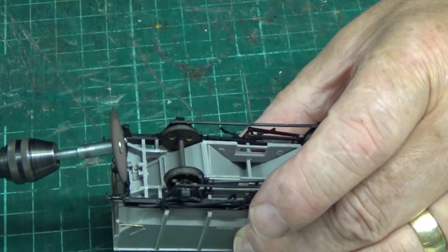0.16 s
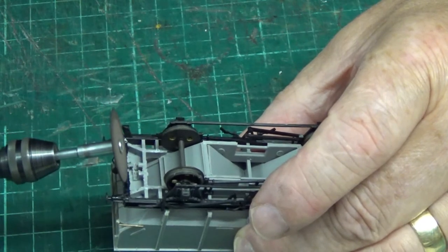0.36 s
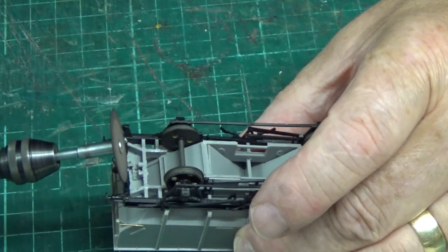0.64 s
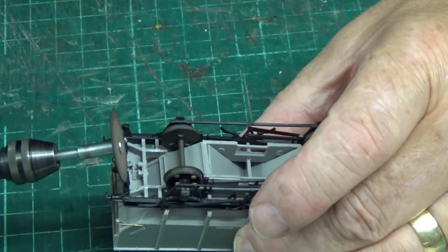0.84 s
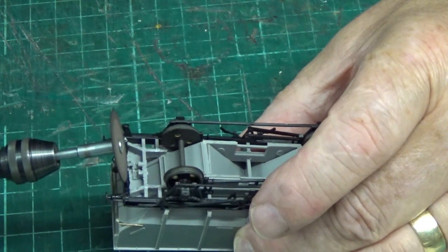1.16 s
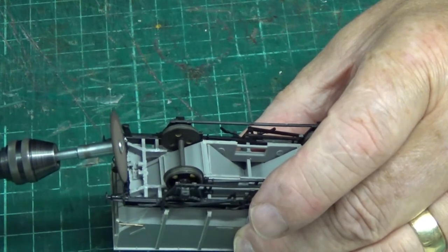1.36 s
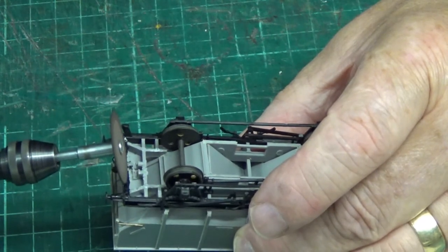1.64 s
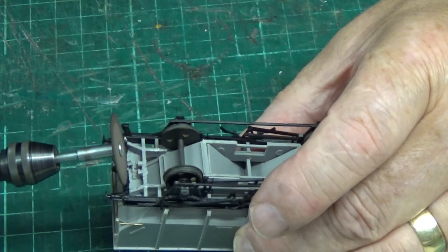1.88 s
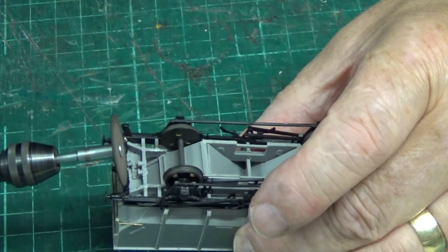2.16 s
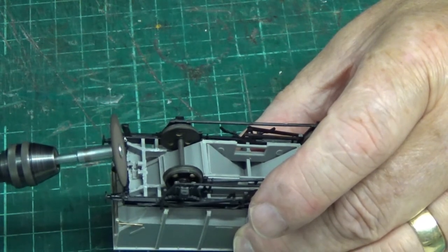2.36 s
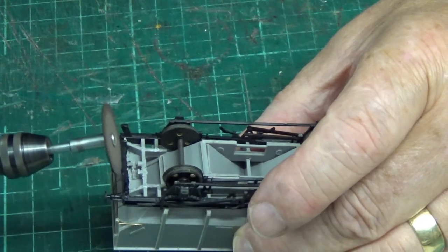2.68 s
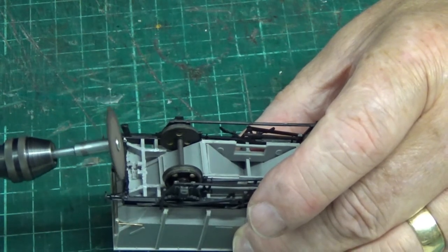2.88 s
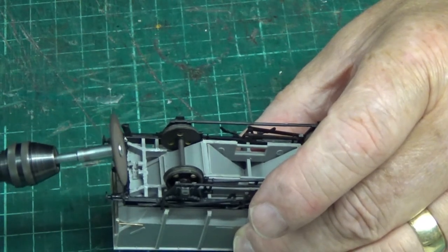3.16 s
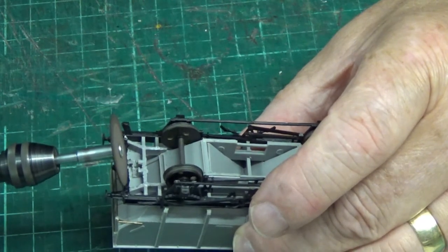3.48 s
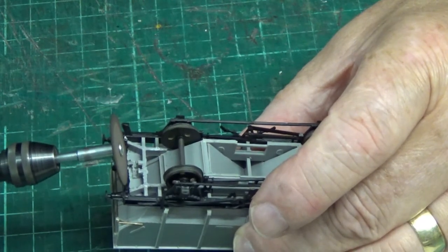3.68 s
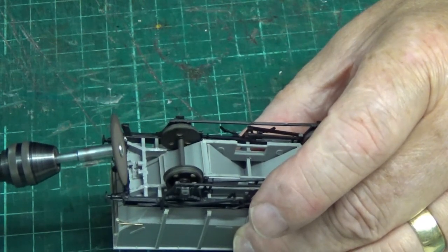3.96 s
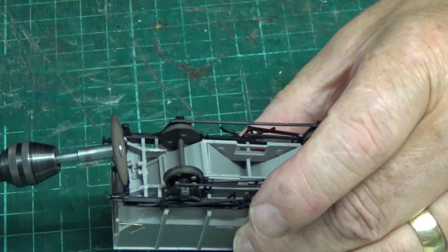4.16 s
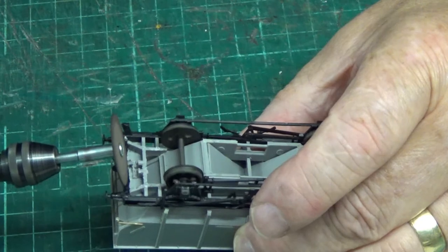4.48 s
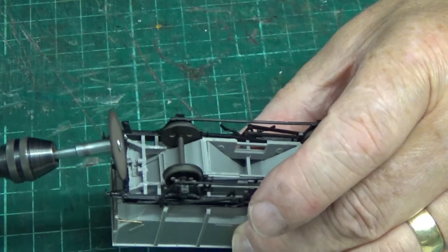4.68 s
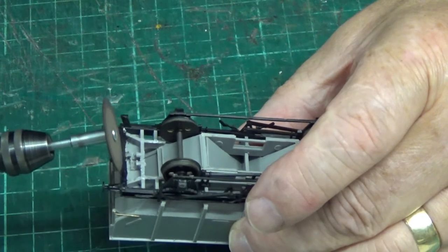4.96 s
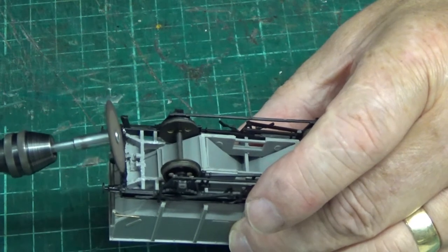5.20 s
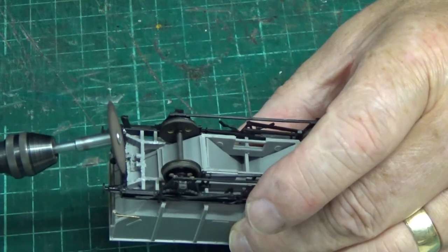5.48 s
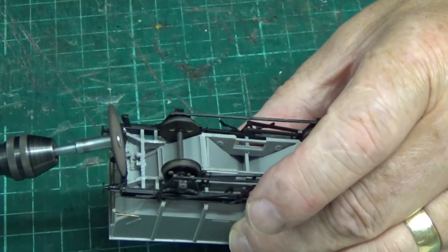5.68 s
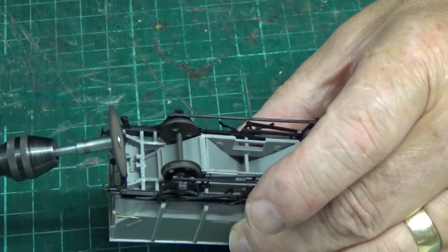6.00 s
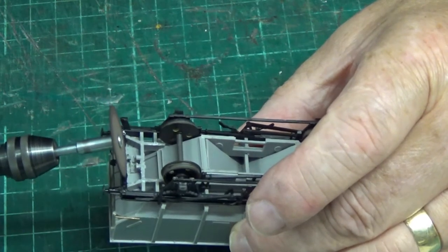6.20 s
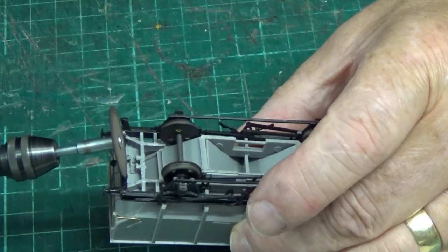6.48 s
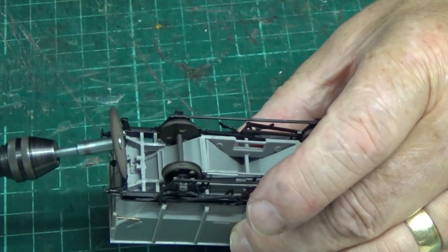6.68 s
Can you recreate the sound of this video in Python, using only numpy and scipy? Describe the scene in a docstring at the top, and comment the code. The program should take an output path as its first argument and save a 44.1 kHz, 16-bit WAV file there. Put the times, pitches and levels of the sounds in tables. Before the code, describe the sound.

A small rotary tool whirrs and whines close to the microphone at a workbench in a quiet room. Its thin cutting disc bites into a plastic model in two longer cuts, then several short ones, grinding with a gritty, fluttering hiss. The motor's pitch sags under pressure and climbs again between cuts. Now and then the disc chatters and gives a brief, very high squeal. A faint electrical hum lies underneath.

```python
"""At a workbench in a quiet room, a small rotary tool cuts a plastic part close to the microphone.
One shaft sets every rhythm of the tool: the commutator whines, fan and brushes whirr, the bearings
sing, and all sag in pitch as the thin abrasive disc bites. The disc runs out of true, so it chatters
on the plastic in short spells and grinds in one gritty burst per turn.
Mains hum lies underneath, and a low drone dies away at the start."""
import sys
import numpy as np
from scipy import signal
from scipy.fft import rfft, irfft, next_fast_len
from scipy.io import wavfile
from scipy.ndimage import uniform_filter1d

SR = 44100
rng = np.random.default_rng(int(sys.argv[2]) if len(sys.argv) > 2 else 0)


def unload_wav(signal):
    """Save mono or channel-first audio to the path in sys.argv[1] as 16-bit WAV at rate SR, clipped to [-1, 1]."""
    wavfile.write(
        sys.argv[1],
        SR,
        np.round(np.clip(np.atleast_2d(signal).T, -1, 1) * 32767).astype(np.int16),
    )


N = 301644

# Partials of the mains hum and of the low drone. Each row: frequency in Hz, level in dB.
HUM_PARTIALS = [(50, -85), (100, -55), (150, -74), (200, -56), (300, -70)]
DRONE_PARTIALS = [(59, -62), (118, -57), (177.5, -45.5), (237, -50)]
# Broad spectra of the room's air, fan and brushes, the disc's rim and the rasping plastic.
# Each row: frequency in Hz, relative spectral density in dB.
ROOM_SPECTRUM = [(15, -27), (50, -18), (160, 2), (400, -5), (2000, -19.5), (15000, -47)]
WHIRR_SPECTRUM = [(60, -22), (300, -31), (700, -15), (1100, -10), (2000, -9), (2600, -7), (4500, -8),
                  (5400, -7), (7500, -7), (10800, -9), (12300, -15), (14000, -19.5), (15800, -28)]
HISS_SPECTRUM = [(500, -39.5), (4000, -20), (7500, -9.5), (8900, -7), (10300, -2.5), (11600, -5),
                 (12800, -11.5), (14000, -10.5), (15800, -18.5)]
RASP_SPECTRUM = [(150, -42), (720, -19), (1150, -5.5), (1500, -12.5), (2600, -4), (4000, 0), (6000, -0.5),
                 (7500, -1), (9500, -1), (15800, -31)]
# Resonances of the housing, the hand-held body, the disc and the plastic part.
# Each row: frequency in Hz, width in Hz, boost in dB.
HOUSING_MODES = [(753, 52, -13.5), (980, 63, -9), (1110, 92, 6), (1328, 48, 3), (1685, 85, 9.5),
                 (2250, 113, 8), (2490, 80, -3), (3043, 105, 9.5), (3360, 150, 11.5), (3710, 81, 6.5),
                 (4230, 230, 2.5), (4456, 560, 9.5), (6370, 99, 5.5), (7470, 110, 7.5)]
BODY_MODES = [(431, 40, 8.5)]
DISC_MODES = [(8400, 73, 3.9), (9820, 530, 7.3), (10430, 240, 3.6), (10900, 190, 5.7), (13500, 490, 4.9)]
PLASTIC_MODES = [(735, 67, -12), (1530, 70, 0), (1872, 136, 12), (2015, 84, 15), (2110, 60, -7),
                 (2300, 63, 11), (2570, 100, -6.5), (3048, 91, 9.5), (3315, 134, 13), (4190, 240, 6.5),
                 (4630, 230, -7), (5120, 69, 9), (5400, 66, 11), (5860, 69, 10), (6300, 110, 4.5),
                 (6780, 130, -5), (7050, 190, 7.5)]
# Commutator pitch, sagging under load and recovering. Each row: time in seconds, frequency in Hz.
WHINE_PITCH = [(0.0, 627), (0.23, 645.5), (0.59, 641.5), (1.31, 604), (2.0, 612), (2.17, 598.2),
               (2.48, 594.2), (2.82, 640.3), (3.12, 661), (3.26, 659.6), (3.5, 610), (3.64, 604),
               (4.4, 612.4), (4.61, 590), (4.67, 589), (5.03, 635.5), (5.43, 664), (5.6, 667.3),
               (5.77, 636.3), (6.19, 662.4), (6.8, 656.5), (6.84, 656)]
# The whirr as the tool shifts in the hand. Each row: time in seconds, gain in dB.
WHIRR_GAIN = [(0, 0.5), (1.5, 0), (2.9, 1.6), (3.8, 0), (4.8, -1), (5.3, -0.5), (5.95, 1), (6.84, -1)]
# Tones of rotor and ball bearings. Each row: multiple of the shaft speed, relative level in dB.
BEARING_TONES = [(8, -10), (10, -8), (10.12, -8.5), (10.23, -12), (12, -14), (12.12, -2.5), (12.23, -10),
                 (14.23, -13), (15.06, -12), (15.89, -7), (16, -11), (16.12, -7), (18, -11), (18.34, -9),
                 (20.11, -11), (21.77, -11), (22, -11), (27.89, -12), (28.34, -7), (31.66, -7), (32, -11),
                 (34.44, -4), (39.68, -8), (43.44, -8)]
# Shaft vibration. Each row: multiple of the shaft speed, level in dB running free, level in dB loaded.
SHAFT_HARMONICS = [(1, -63, -65), (2, -52, -53), (4, -66, -59)]
# The disc pressed into the plastic. Each row: start, end and attack in seconds, strength in dB,
# once-a-turn swing in dB, seconds until that swing is full, initial rasp relative to hiss in dB.
CUTS = [(.16, 2.53, .15, .2, 4, .25, -4.6), (3.17, 4.69, .06, .3, 4.6, .6, -4.3),
        (5.5, 5.85, .15, 1.8, 2, .3, -6), (6.09, 6.3, .025, 0, 5, .07, -6),
        (6.27, 6.42, .07, -2.5, 4, .05, -4.5), (6.39, 6.76, .05, 0, 4.5, .05, -6),
        (6.69, 6.9, .1, -1, 3, .05, -5)]
# Spells of chatter. Each row: start and end in seconds, knock and squeal levels in dB, squeal in Hz.
CHATTER_SPELLS = [(.17, 0.267, -49, -26.5, 14000), (0.175, 0.277, -49, -26, 11700),
                  (1.77, 2.05, -30, -45, 13900), (2.51, 2.54, -31, -28, 11900),
                  (3.175, 3.24, -40, -28, 13300), (3.24, 3.398, -27.5, -42, 13800),
                  (5.449, 5.505, -42, -27.5, 11800), (5.52, 5.572, -33, -22.5, 11340),
                  (5.542, 5.807, -30, -42, 14500), (6.73, 6.846, -46, -31, 13600)]
# Modes struck by a tap. Each row: frequency in Hz, width in Hz, relative level in dB.
KNOCK_MODES = [(1700, 50, -2), (1965, 90, 1), (3020, 200, -11), (4080, 250, -4), (5150, 160, 0),
               (5560, 220, -1), (7050, 400, -9)]
# High modes of the disc. Each row: ratio to the squeal pitch, width in Hz, relative level in dB.
SQUEAL_MODES = [(.72, 350, -9.5), (1, 280, -4.5), (1.025, 700, -7.5)]
# Stereo width of the reflections. Each row: frequency in Hz, gain of the side signal in dB.
SIDE_SPECTRUM = [(130, -63), (330, -14), (600, -34), (1100, -16), (2500, -22), (4200, -15.5), (9000, -10.5),
                 (14000, -43)]

SWITCHES_PER_TURN, WORKING_TURNS_PER_S = 6, 105


def from_db(db):
    """Amplitude grows tenfold for every 20 dB."""
    return 10 ** (np.asarray(db) / 20)


def unit_power(x):
    """Division by the RMS value gives a mean power of one."""
    return x / np.sqrt(np.mean(x ** 2) + 1e-20)


def curve(rows):
    """Linear interpolation turns (seconds, value) rows into a value at every sample."""
    seconds, values = np.transpose(rows)
    return np.interp(np.arange(N) / SR, seconds, values)


def drift(corner_hz):
    """Low-passed noise wanders at random, with an RMS value of one."""
    step, settling = 20, 4000  # one value per 20 samples; the filter's onset is dropped
    pole = np.exp(-2 * np.pi * corner_hz * step / SR)
    noise = rng.standard_normal(N // step + settling + 2)
    slow = signal.lfilter([1], [1, -2 * pole, pole * pole], noise)[settling:]
    return np.interp(np.arange(N) / step, np.arange(len(slow)), unit_power(slow))


def sine(cycles):
    """A simple harmonic oscillation has unit power here, and a random starting phase."""
    return np.sqrt(2) * np.sin(2 * np.pi * (cycles + rng.random()))


def colour(x, spectrum=((1000, 0),), modes=()):
    """A minimum-phase filter lets resonances ring after their cause; the default spectrum is flat."""
    size = 2 * next_fast_len(N // 2 + SR // 10)
    hz = np.maximum(np.arange(size // 2 + 1) * SR / size, 1)
    points = np.array(spectrum)
    db = np.interp(np.log(hz), np.log(points[:, 0]), points[:, 1])
    for centre, width, boost in modes:
        db = db + boost / (1 + (2 * (hz - centre) / width) ** 2)
    # folding the cepstrum onto positive time makes the filter causal
    cepstrum = irfft(db * np.log(10) / 20)
    cepstrum[1:size // 2] *= 2
    cepstrum[size // 2 + 1:] = 0
    return irfft(rfft(x, size) * np.exp(rfft(cepstrum)))[:N]


def ring(x, modes):
    """Damped modes driven by one force superpose, here with alternating signs and unit total power."""
    out = 0
    for k, (hz, width, db) in enumerate(modes):
        r = np.exp(-np.pi * width / SR)
        mode = signal.lfilter([1, 0, -1], [1, -2 * r * np.cos(2 * np.pi * hz / SR), r * r], x)
        out = out + (-1) ** k * from_db(db) * (1 - r * r) / 2 * mode
    return unit_power(out)


def background():
    """Mains harmonics, an exponentially fading drone and the room's air add by superposition."""
    t = np.arange(N) / SR
    hold_s, fade_db_per_s = 0.26, 90
    hum = sum(from_db(db) * sine(hz * t) for hz, db in HUM_PARTIALS)
    drone = sum(from_db(db) * sine(hz * t) for hz, db in DRONE_PARTIALS)
    fade = from_db(-fade_db_per_s * np.maximum(t - hold_s, 0))
    air = unit_power(colour(rng.standard_normal(N), ROOM_SPECTRUM))
    return hum + fade * drone + from_db(-56) * air


def whirr(turns, swell_db, flutter_db, sing_db, tone_count):
    """Rotation modulates air and brush noise and faint bearing tones twice a turn; the housing rings."""
    swell = from_db(swell_db * np.cos(4 * np.pi * turns) + flutter_db * drift(9.2))
    multiples = 44 + 95 * (np.arange(tone_count) + rng.random(tone_count)) / tone_count
    rolling = turns + .0025 * drift(30)
    singing = unit_power(sum(rng.rayleigh() * sine(multiple * rolling) for multiple in multiples))
    excitation = (rng.standard_normal(N) + from_db(sing_db) * singing) * swell
    return unit_power(colour(excitation, WHIRR_SPECTRUM, HOUSING_MODES))


def bearings(turns):
    """Close pairs of tones beat, and each swells as it glides through a resonance of the housing."""
    tones = 0
    for multiple, db in BEARING_TONES:
        unrest = np.sqrt(multiple / 10)  # higher tones are less steady
        gain = from_db(db + 1.5 * unrest * drift(16))
        tones = tones + gain * sine(multiple * turns + .012 * unrest ** 2 * drift(8))
    return colour(tones, modes=HOUSING_MODES)


def whine(turns, waver_db):
    """Periodic switching of the commutator gives a tone at a multiple of the shaft speed."""
    return from_db(waver_db * drift(28)) * sine(SWITCHES_PER_TURN * turns)


def shake(turns, load):
    """An unbalanced shaft forces the body to vibrate; the top harmonic grows under load."""
    tones = sum(from_db(free_db + load * (loaded_db - free_db)) * sine(multiple * turns)
                for multiple, free_db, loaded_db in SHAFT_HARMONICS)
    return colour(tones, modes=BODY_MODES)


def motor(turns, speed, load):
    """Four sources locked to one shaft superpose, their levels following its speed or load."""
    excess_speed = speed - WORKING_TURNS_PER_S
    air = whirr(turns, swell_db=1.5, flutter_db=.4, sing_db=-5, tone_count=80)
    return (from_db(-26 + 0.19 * excess_speed + curve(WHIRR_GAIN)) * air
            + from_db(-43 + 0.22 * excess_speed - 1.4 * load) * bearings(turns)
            + from_db(-41.5 - 0.34 * excess_speed - 4 * load) * whine(turns, waver_db=2.0)
            + shake(turns, load))


def pressing():
    """Contact force rises, holds and lets go in each cut, setting the load (0-1) and the grinding."""
    t = np.arange(N) / SR
    grind_db, release_s = -18.5, .06
    bite_db, bite_s = 1, 0.19  # a fresh bite is louder, then eases
    deepening_db_per_s = 1.3  # the plastic rings more as the slot deepens
    load, grind_gain, swing_db, rasp_db = np.zeros((4, N))
    for start, end, attack_s, strength_db, full_swing_db, seating_s, first_rasp_db in CUTS:
        age = np.maximum(t - start, 0)
        touch = np.clip(np.minimum(age / attack_s, (end - t) / release_s), 0, 1)
        load = load + touch
        grind_gain += touch * from_db(grind_db + strength_db + bite_db * np.exp(-age / bite_s))
        swing_db = np.where(t > start, full_swing_db * np.minimum(age / seating_s, 1) ** 2, swing_db)
        rasp_db = np.where(t > start, first_rasp_db + deepening_db_per_s * age, rasp_db)
    hand_waver = from_db(.3 * drift(2.8))
    return np.minimum(load, 1), grind_gain * hand_waver, swing_db, rasp_db


def grit(contact, spread_db, dust, grains_per_s=11000):
    """Random impacts of uneven abrasive grains make shot noise over finer dust; contact modulates both."""
    strikes = (rng.random(N) < grains_per_s / SR) * rng.choice([-1, 1], N)
    sizes = from_db(spread_db * np.minimum(rng.exponential(1, N), 5))
    envelope = contact / np.sqrt(uniform_filter1d(contact ** 2, SR // 20))
    return envelope * (unit_power(strikes * sizes) + dust * rng.standard_normal(N))


def shifting_contact(x, fast_db, slow_db, band_count):
    """A moving point of excitation drives each frequency band now more, now less strongly."""
    size = next_fast_len(N)
    spectrum = rfft(x, size)
    band_position = band_count * np.sqrt(np.linspace(0, 1, len(spectrum)))
    out = 0
    for k in range(band_count):
        band = irfft(spectrum * np.maximum(1 - np.abs(band_position - k), 0), size)[:N]
        out = out + band * from_db(fast_db * drift(55) + slow_db * drift(6))
    return unit_power(out)


def grinding(turns, swing_db, rasp_db):
    """Runout modulates abrasion: the rim hisses most at its high side, the plastic rasps more evenly."""
    angle = 2 * np.pi * (turns + 0.19 * drift(8.0))  # the contact point wanders round the rim
    contact_db = -swing_db * np.cos(angle) - 2.5 * np.cos(2 * angle)
    rim_grit = grit(from_db(contact_db - 2.5 * drift(200)), spread_db=0.5, dust=0.38)
    plastic_grit = grit(from_db(0.59 * contact_db + 1.6 * drift(106)), spread_db=3.0, dust=0.62)
    hiss = unit_power(colour(rim_grit, HISS_SPECTRUM, DISC_MODES))
    rasp = unit_power(colour(plastic_grit, RASP_SPECTRUM, PLASTIC_MODES))
    return shifting_contact(hiss + from_db(rasp_db) * rasp, fast_db=2.0, slow_db=0.64, band_count=20)


def chatter(turns, ramp_s, decay_per_tap):
    """The warped disc taps twice a turn: impact excites a knock, and friction a short squeal."""
    t = np.arange(N) / SR
    taps = unit_power(np.diff(np.floor(2 * turns), prepend=0) * from_db(.5 * drift(80)))
    rub = unit_power(np.exp(-decay_per_tap * (2 * turns % 1)) * rng.standard_normal(N))
    knock = ring(taps, KNOCK_MODES)
    out = 0
    for start, end, knock_db, squeal_db, squeal_hz in CHATTER_SPELLS:
        gate = np.clip(np.minimum(t - start, end - t) / ramp_s + .5, 0, 1)
        squeal = ring(rub, [(ratio * squeal_hz, width, db) for ratio, width, db in SQUEAL_MODES])
        out = out + gate * (from_db(knock_db) * knock + from_db(squeal_db) * squeal)
    return out


def bench_reflections(x, pan_db, side_db, decay_s):
    """Reflections that differ between the microphone's two sides give the direct sound stereo width."""
    t = np.arange(SR // 20) / SR
    echoes = rng.standard_normal(len(t)) * np.exp(-t / decay_s)
    reflected = signal.fftconvolve(x, echoes / np.linalg.norm(echoes))[:N]
    side = from_db(side_db) * colour(reflected, SIDE_SPECTRUM)
    return np.array([x * from_db(pan_db / 2) + side, x * from_db(-pan_db / 2) - side])


def scene():
    """Shaft angle, the integral of speed, keeps motor, grinding and chatter in step."""
    speed = curve(WHINE_PITCH) / SWITCHES_PER_TURN  # turns per second
    turns = np.cumsum(speed * (1 + .0007 * drift(15))) / SR
    load, grind_gain, swing_db, rasp_db = pressing()
    cut = grind_gain * grinding(turns, swing_db, rasp_db)
    cut = cut + chatter(turns, ramp_s=0.02, decay_per_tap=1.8)
    return (bench_reflections(motor(turns, speed, load), pan_db=1.0, side_db=1, decay_s=0.018)
            + bench_reflections(cut, pan_db=0, side_db=-6.5, decay_s=0.0087)
            + background())


def record(dry):
    """Soft saturation rounds the peaks, and a steep low-pass filter removes the highest treble."""
    ceiling, cutoff_hz = 0.64, 15800
    rounded = ceiling * np.tanh(dry / ceiling)
    return signal.sosfilt(signal.ellip(14, .1, 90, cutoff_hz, fs=SR, output="sos"), rounded)


dry = scene()
out = record(dry)
unload_wav(out)
```